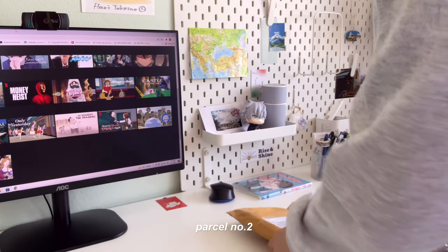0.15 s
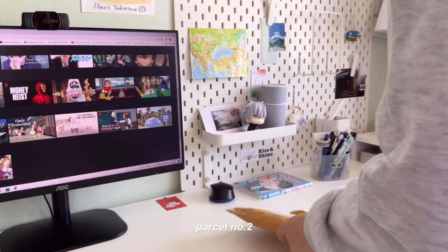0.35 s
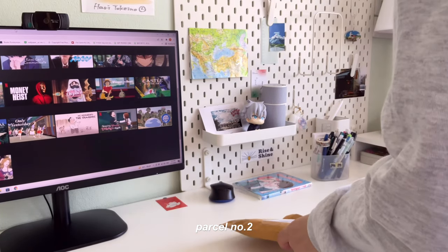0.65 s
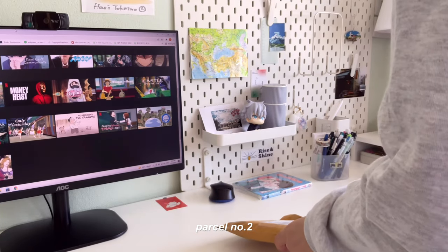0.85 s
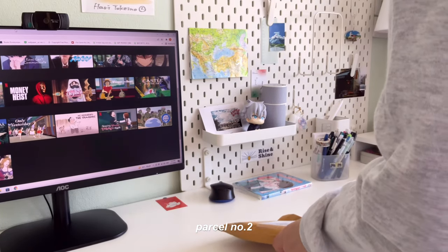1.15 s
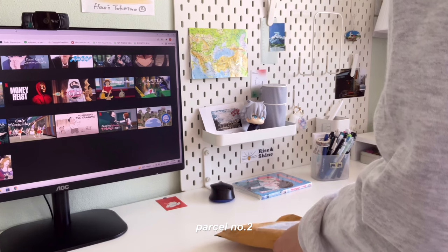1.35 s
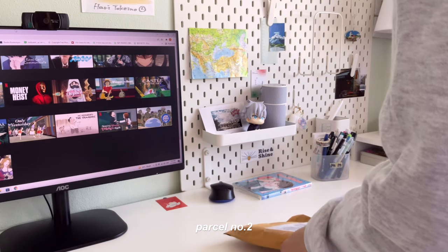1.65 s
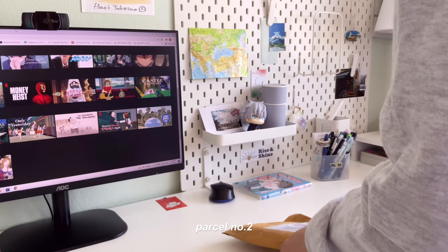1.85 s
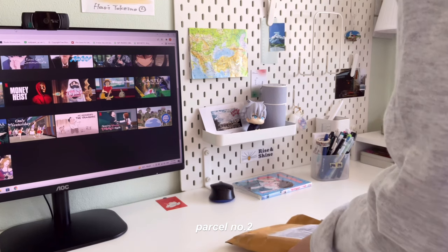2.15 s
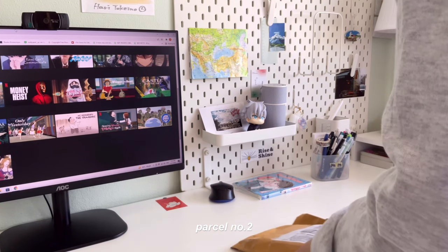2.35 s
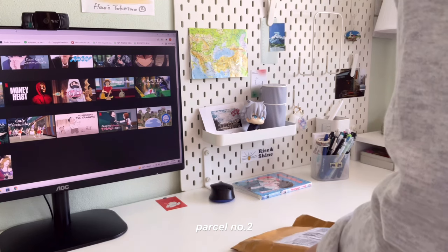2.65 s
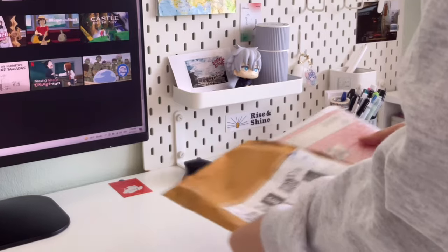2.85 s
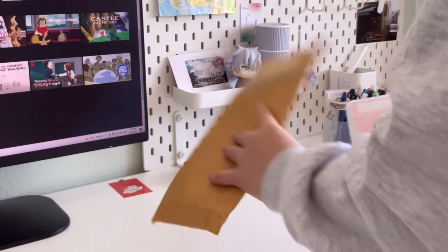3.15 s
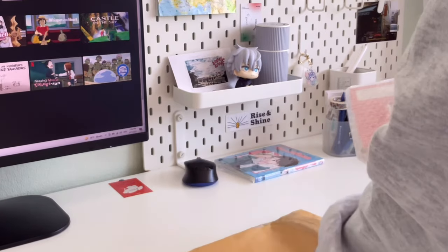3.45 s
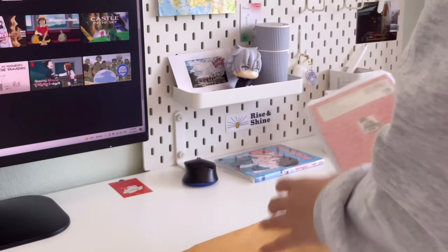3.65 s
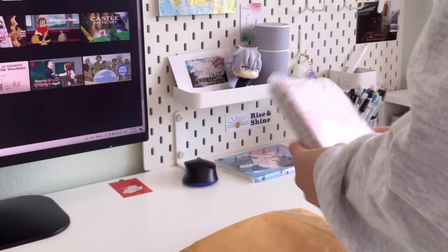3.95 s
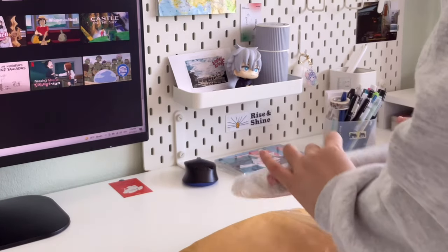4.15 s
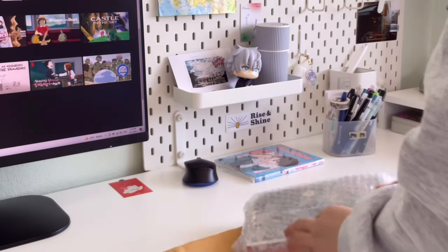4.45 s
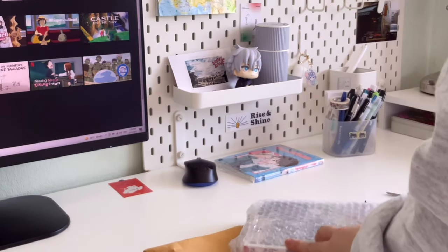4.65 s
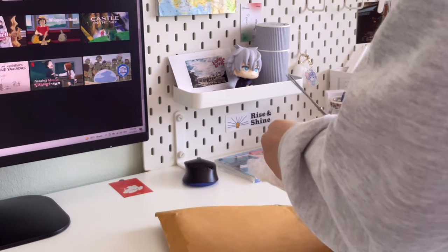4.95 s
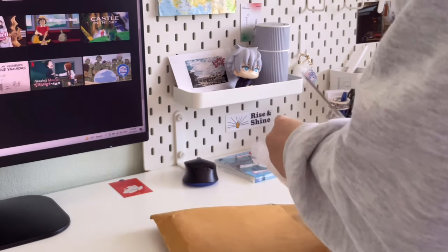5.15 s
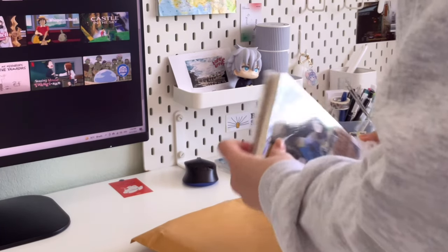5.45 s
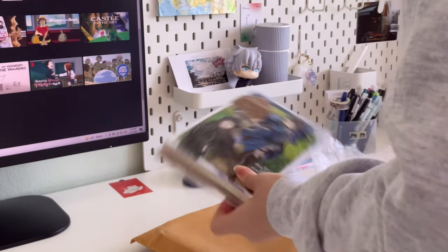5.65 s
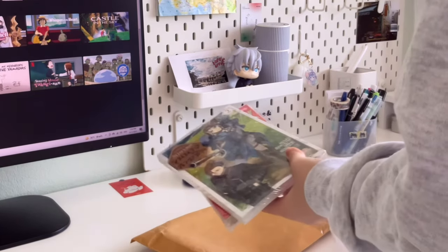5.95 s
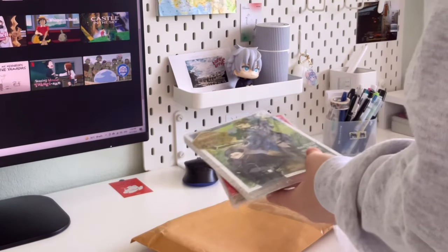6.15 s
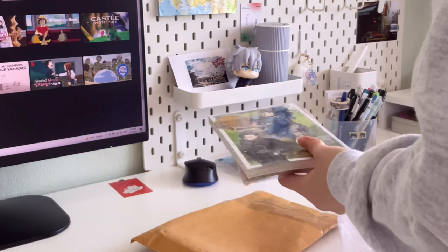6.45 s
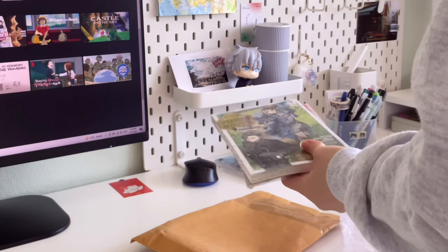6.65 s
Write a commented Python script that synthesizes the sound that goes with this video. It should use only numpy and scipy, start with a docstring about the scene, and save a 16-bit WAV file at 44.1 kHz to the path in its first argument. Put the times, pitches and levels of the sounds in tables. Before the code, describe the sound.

Close stereo phone pickup of a parcel being opened: an initial papery crackle, near quiet, uneven sawing and tearing strokes, then a dense loud flurry of stiff paper snaps and light desk thumps. Afterwards sparse wrap handling, one stronger crinkly hiss, faint ticking film and finally a short hollow case clack. Small, slightly live room with steady low hum and wavering rumble.

```python
"""At a desk in a small quiet room a padded paper mailer is sawn and torn open, emptied and dropped; then the
plastic wrap inside is turned over and slid off a hollow case, which knocks. Dense slips rub with a grainy hiss,
buckles ring patches of the sheet, bursts ring snapping creases and ticking wrap, and modes ring the case.
Filtered noise hums and rumbles low throughout. A phone's two ports listen from the side."""
import sys
import numpy as np
from scipy import signal
from scipy.fft import rfft, irfft, next_fast_len
from scipy.io import wavfile

SR = 44100
rng = np.random.default_rng(int(sys.argv[2]) if len(sys.argv) > 2 else 0)


def put_to_file(sound):
    """Save the sound as 16-bit audio at rate SR, in the file named by the first command-line argument."""
    columns = np.atleast_2d(sound).T  # one column per channel
    safe = np.clip(columns, -1, 1)
    whole_steps = np.round(safe * 32767)
    wavfile.write(sys.argv[1], SR, whole_steps.astype(np.int16))


N = 299880
SIZE = next_fast_len(N + SR)   # FFT length
BIN_HZ = np.arange(SIZE // 2 + 1) * SR / SIZE


def amp(db):
    """Decibels to amplitude."""
    return 10 ** (np.asarray(db) / 20)


def rms_one(x):
    """Scale to rms 1."""
    return x / np.sqrt(np.mean(x ** 2) + 1e-20)


def at_hz(points, hz):
    """Read a (Hz, value) table on a log frequency axis."""
    table = np.array(points)
    return np.interp(np.log(hz + 1), np.log(table[:, 0] + 1), table[:, 1])


def in_time(rows, quiet_db=None):
    """Columns joined by straight lines in time; quiet_db holds outside the rows."""
    seconds, *columns = np.transpose(rows)
    t = np.arange(N) / SR
    return [np.interp(t, seconds, column, quiet_db, quiet_db) for column in columns]


def filtered(x, response):
    """Multiply the spectrum by a response."""
    return irfft(rfft(x, SIZE) * response, SIZE)[..., :N]


def drift(rate_hz):
    """Slow random wander of rms 1: noise through a two-pole low-pass."""
    r = np.exp(-2 * np.pi * rate_hz / SR)
    wander = signal.lfilter([1], [1, -2 * r, r * r], rng.standard_normal(N + SR))
    return rms_one(wander[SR:])   # settled part only


def ring(x, hz, cycles):
    """A resonant mode that dies by 60 dB in so many cycles."""
    r = amp(-60 * hz / (cycles * SR))
    w = 2 * np.pi * min(hz, 17000.) / SR
    return signal.lfilter([0, np.sin(w)], [1, -2 * r * np.cos(w), r * r], x + 1e-18)


def grains(per_s, spread_db, clump_db, clump_hz):
    """Tiny slips of uneven size and random sign that come in clumps; rms 1."""
    sizes = amp(spread_db * np.minimum(rng.exponential(1, N), 5)) * rng.choice([-1, 1], N)
    happens = rng.random(N) < per_s / SR
    return rms_one(sizes * happens * amp(clump_db * drift(clump_hz)))


def burst(noise, length_s):
    """A sharp release followed by ragged after-slips that decay exponentially."""
    t = np.arange(len(noise)) / SR
    release = 3.06 * (t < 5e-5)
    return (noise + release) * np.exp(-t / np.clip(length_s, 2e-4, .02))


def add(out, s, sound, peak_db, pan_db, lag):
    """Lay in a sound of given peak; pan_db is left minus right, lag delays the left in samples."""
    for side, sign in zip(out, (1, -1)):
        at = round(s * SR) + (lag if sign > 0 else 0)
        part = side[at:at + len(sound)]
        part += amp(peak_db + sign * pan_db / 2) * sound[:len(part)] / np.max(np.abs(sound))


def blend(mid, side):
    """Two noises mixed to a set left-right likeness per frequency."""
    # Each row: frequency in Hz, left-right likeness (1 = alike, 0 = unrelated).
    likeness = [(60, 1.0), (130, 0.98), (290, 0.85), (640, -0.04), (1410, -0.071), (3100, 0.17),
                (6820, 0.96), (15000, 0.99)]
    alike = np.clip(at_hz(likeness, BIN_HZ), -1, 1)
    mid = filtered(mid, np.sqrt(1 + alike))
    side = filtered(side, np.sqrt(1 - alike))
    return np.array([mid + side, mid - side]) / np.sqrt(2)


def hands():
    """Each stroke swells to its peak and dies; powers add, and buckling power weights the panel's pitch."""
    # Strokes, tugs and squeezes. Each row: peak time, rise and fall in seconds, buckling level in dB,
    # panel pitch in Hz, rubbing level, sheen level and weight on the desk in dB; all levels before trim.
    strokes = [(0.096, 0.029, 0.05, -47, 1900, -39, -46.5, -55),
               (0.195, 0.015, .02, -40, 1590, -66, -69, -43.5),
               (0.219, 0.0026, 0.053, -45, 1820, -45, -52, -50),
               (.405, .01, 0.034, -57, 700, -66, -80, -43), (.58, 0.083, 0.24, -53, 515, -63, -74, -44),
               (.835, 0.045, 0.035, -55, 700, -82, -99, -46), (.95, 0.005, .03, -56, 800, -77, -97, -52),
               (1.01, .03, 0.026, -54, 780, -68, -95, -54),
               (1.042, 0.0038, 0.018, -45, 1000, -56, -57.5, -66),
               (1.22, 0.073, 0.055, -41, 779, -58, -55, -49),
               (1.291, 0.072, 0.07, -35.5, 1110, -43.5, -48, -39.5),
               (1.424, 0.0043, 0.062, -38.5, 884, -45.5, -57, -59),
               (1.536, 0.085, 0.067, -38, 794, -46.5, -51.5, -45.5),
               (1.722, 0.082, 0.17, -37, 1120, -45, -61, -52),
               (1.808, .005, 0.029, -43, 1020, -45, -50, -47),
               (1.951, 0.099, .12, -40.5, 1170, -47.5, -50.5, -64),
               (2.159, 0.055, 0.095, -30.5, 1070, -43.5, -44.5, -46),
               (2.35, 0.13, 0.1, -40.5, 1190, -46.5, -50, -59),
               (2.546, 0.016, 0.049, -26.5, 1120, -32, -31.5, -48),
               (2.618, 0.069, 0.056, -39.5, 1220, -38.5, -54, -56),
               (2.739, 0.065, 0.058, -38, 780, -53, -56, -41),
               (2.769, 0.0058, 0.057, -23.5, 900, -47, -56, -52),
               (2.839, 0.029, .03, -38, 1340, -34.5, -57, -34),
               (2.859, 0.052, 0.022, -23.5, 1090, -40, -51, -46),
               (2.905, 0.012, 0.042, -35, 1590, -56, -61, -30),
               (2.986, 0.044, 0.033, -31, 1190, -45, -48, -48),
               (3.044, 0.025, 0.035, -25.5, 1500, -37, -48, -35.5),
               (3.19, 0.054, .05, -60, 635, -63, -64, -60), (3.26, 0.0028, .03, -55, 1500, -51, -43.5, -60),
               (3.29, 0.023, 0.053, -24, 1340, -35.5, -43.5, -31),
               (3.338, 0.014, 0.078, -32, 1500, -39, -51, -37),
               (3.397, 0.0062, 0.078, -31.5, 500, -39, -54, -30.5),
               (3.611, 0.0065, 0.035, -29.5, 1530, -54, -76, -34.5),
               (3.66, 0.057, 0.13, -47, 1480, -56.5, -75, -61),
               (3.843, 0.0028, 0.057, -47.5, 1180, -45.5, -63, -44),
               (3.94, 0.17, 0.18, -64, 1200, -49.5, -50, -67),
               (4.08, 0.17, 0.17, -53.5, 960, -48, -48, -49.5),
               (4.254, 0.03, 0.2, -50.5, 700, -50.5, -52.5, -44.5),
               (4.34, 0.065, .08, -58, 1000, -50.5, -49, -58),
               (4.376, 0.01, 0.037, -27.5, 990, -46, -53, -32),
               (4.542, 0.063, 0.1, -33.5, 1300, -55, -63, -38),
               (4.664, .02, 0.075, -46, 1500, -57, -67, -38),
               (4.95, 0.026, 0.24, -67, 750, -52.5, -54.5, -49),
               (5.121, 0.073, 0.069, -56, 1700, -42.5, -41, -62),
               (5.144, 0.0032, 0.037, -37, 1100, -26, -46, -31.5),
               (5.181, 0.063, 0.094, -31.5, 712, -32.5, -33, -31.5),
               (5.24, 0.1, 0.16, -36.5, 1130, -37, -38, -36.5),
               (5.395, 0.14, .08, -59, 1100, -48.5, -50, -57),
               (5.816, 0.17, 0.11, -52, 970, -50.5, -50.5, -54),
               (6.599, 0.018, 0.11, -42, 1420, -40.5, -60, -42),
               (6.79, 0.0038, 0.06, -39, 1430, -32.5, -70, -71)]
    # Faint handling between strokes. Each row: time in seconds, buckling, rubbing and sheen in dB before trim.
    holding = [(0, -44.5, -51, -60), (.3, -49.5, -58.5, -68), (.53, -60, -74, -90), (.72, -75, -80, -104),
               (.86, -65.5, -111, -99), (1.0, -54, -74, -99), (1.1, -61, -70.5, -86),
               (1.4, -50.5, -58, -91), (2.07, -59, -70, -89), (2.48, -62, -68, -74), (2.9, -35, -44, -50.5),
               (3.1, -50.5, -54, -62), (3.25, -58.5, -70, -78), (3.48, -55, -56, -60.5),
               (3.8, -67, -70, -80), (4.22, -68, -62.5, -61), (4.47, -53, -54.5, -61.5),
               (4.72, -54, -57.5, -58), (4.9, -65, -69.5, -83), (5.05, -54.5, -54.5, -55),
               (5.5, -56.5, -58.5, -59), (5.95, -66, -60.5, -57.5), (6.1, -67, -68.5, -73.5),
               (6.4, -62, -69, -70), (6.56, -67, -69, -79), (6.8, -53, -62, -75)]
    holding_panel_hz, holding_weight_db = 700, -57.5
    span_db = 20.5   # level lost over one rise or fall
    step = 32   # samples per control point
    buckle_db, rub_db, sheen_db = [column[::step] for column in in_time(holding)]
    t = (np.arange(0, N + step, step) / SR)[:len(rub_db)]
    s, rise_s, fall_s, *peaks = np.array(strokes).T[:, :, None]
    stroke_buckle_db, stroke_panel_hz, stroke_rub_db, stroke_sheen_db, stroke_weight_db = peaks

    away = np.where(t < s, (s - t) / np.maximum(rise_s, .002), (t - s) / np.maximum(fall_s, .002))
    swell_power = amp(-2 * span_db * np.minimum(away, 6))
    stroke_levels_db = (stroke_buckle_db, stroke_rub_db, stroke_sheen_db, stroke_weight_db)
    parts = [amp(2 * db) * swell_power for db in stroke_levels_db]
    rests = [amp(2 * db) for db in (buckle_db, rub_db, sheen_db, holding_weight_db)]
    powers = [part.sum(axis=0) + rest for part, rest in zip(parts, rests)]

    pitch_sum = (parts[0] * stroke_panel_hz).sum(axis=0) + rests[0] * holding_panel_hz
    centre_hz = pitch_sum / powers[0]
    buckle_db, rub_db, sheen_db, weight_db = 10 * np.log10(powers)
    return in_time(np.transpose([t, buckle_db, centre_hz, rub_db, sheen_db, weight_db]))


def buckling(level_db, centre_hz):
    """Small buckles fall on patches of the sheet, each ringing a few cycles; the panel favours one pitch."""
    # Buckling colour. Each row: frequency in Hz, relative level in dB per Hz.
    paper = [(150, -32), (250, 1), (661, -3.5), (1010, -1), (1170, -20), (1300, 0), (1560, -3), (2690, -12),
             (3500, -16), (4550, -46), (7700, -120)]
    slips = grains(per_s=2500, spread_db=3.0, clump_db=1.0, clump_hz=60)
    pitches_hz = np.geomspace(260, 3200, num=16)
    patch = rng.integers(0, 16, N)   # which patch each slip falls on
    focus_db_per_octave = 3.8 * (centre_hz / 1000.) ** 1.7   # small taut panels keep closer to their pitch
    rings, power = 0, 0
    for k, hz in enumerate(pitches_hz):
        octaves_off = np.minimum(np.abs(np.log2(hz / centre_hz)), 1.5)
        gain = amp(at_hz(paper, hz) - focus_db_per_octave * octaves_off) * np.sqrt(hz)
        rings = rings + gain * rms_one(ring(slips * (patch == k), hz, cycles=9.5))
        power = power + gain ** 2
    return amp(level_db - 5.5) * rings / np.sqrt(power)


def rubbing(rub_db, sheen_db):
    """Fibres slip so densely that they hiss; smooth plastic adds the sheen on top."""
    # Rubbing colour. Each row: frequency in Hz, relative level in dB per Hz.
    rub_colour = [(1060, -13.5), (1800, -2.5), (1930, -3.5), (2620, -3), (3700, -2.5), (6860, -13.5),
                  (7560, -19.5), (8500, -22), (11000, -22.5), (18700, -120)]
    # Sheen colour. Each row: frequency in Hz, relative level in dB per Hz.
    sheen_colour = [(3530, -26.5), (6000, -0.5), (7800, -6), (11100, -3.5), (15200, -6), (16200, 5.5),
                    (16500, -47)]
    slips = grains(per_s=14000, spread_db=1.5, clump_db=1.5, clump_hz=85)
    rub = rms_one(filtered(slips, amp(at_hz(rub_colour, BIN_HZ))))
    sheen = rms_one(filtered(slips, amp(at_hz(sheen_colour, BIN_HZ))))
    return amp(rub_db - 2.5) * rub + amp(sheen_db - 2.0) * sheen


def desk(weight_db):
    """The desk top booms dully under the parcel: band-passed slips."""
    band = signal.butter(2, [110., 380.], "band", fs=SR, output="sos")
    slips = grains(per_s=600, spread_db=1.4, clump_db=3.7, clump_hz=49)
    return amp(weight_db - 5.5) * rms_one(signal.sosfilt(band, slips))


def snaps():
    """A crease gives way: a burst rings the panel and two neighbours."""
    # Creases snapping. Each row: start in seconds, peak in dB before trim, ring in Hz, burst decay in seconds.
    creases = [(0.069, -32.5, 1540, 0.0096), (0.08, -20.5, 2080, 0.01), (0.092, -21.5, 1810, 0.0058),
               (0.103, -24, 1880, .005), (.111, -28, 1980, 0.0047), (0.189, -31.5, 1030, 0.0032),
               (.217, -16, 1920, 0.0019), (.231, -34.5, 675, 0.0017), (1.042, -40, 807, 0.002),
               (1.244, -40, 940, 0.0027), (1.275, -26.5, 990, .0023), (1.299, -29.5, 855, 0.0069),
               (1.363, -30.5, 910, 0.0026), (1.538, -34, 1120, 0.0034), (1.699, -34, 1170, 0.0026),
               (1.726, -29, 1450, .0027), (1.754, -30, 870, 0.0075), (1.81, -25, 1010, 0.0037),
               (2.112, -35, 799, 0.0077), (2.15, -28.5, 980, 0.007), (2.17, -25.5, 960, 0.01),
               (2.532, -26, 1770, .0045), (2.548, -12, 1025, 0.0012), (2.577, -32, 1600, .003),
               (2.61, -30, 1490, .0038), (2.705, -36, 1550, .0034), (2.749, -26.5, 1320, .0036),
               (2.769, -26.5, 685, .0034), (2.781, -26, 900, 0.0027), (2.812, -22.5, 673, 0.0053),
               (2.84, -16, 1560, 0.007), (2.848, -21.5, 1160, .0047), (2.904, -19, 1920, 0.0066),
               (2.974, -32, 890, 0.0053), (2.983, -24, 1430, 0.0093), (3.036, -20.5, 1840, 0.0046),
               (3.046, -39, 1760, 0.0031), (3.114, -37.5, 1120, 0.0038), (3.276, -22, 1530, 0.0033),
               (3.294, -22.5, 1530, 0.0086), (3.34, -17.5, 1580, 0.0074), (3.397, -26, 394, 0.0039),
               (3.407, -22, 1530, 0.0047), (3.443, -22.5, 1230, 0.0055), (3.609, -18, 1970, 0.0062),
               (4.372, -22, 1160, 0.01), (4.499, -36, 950, 0.0052), (4.512, -27.5, 1250, 0.0052),
               (4.539, -23.5, 1330, 0.0058), (4.547, -17.5, 1300, 0.0019), (4.655, -26, 2050, .0039),
               (4.704, -34.5, 1000, 0.005), (4.941, -44, 880, 0.0042), (5.142, -27.5, 680, 0.004),
               (5.182, -20.5, 664, 0.0076), (5.23, -27, 1250, 0.0027), (5.79, -41, 1800, 0.0031)]
    pan_db, pan_scatter_db = -2.5, 1   # left minus right, and its spread
    out = np.zeros((2, N))
    noises = rng.standard_normal((len(creases), 2601))
    lags = rng.integers(-2, 3, len(creases))
    for (s, peak_db, hz, decay_s), noise, lag in zip(creases, noises, lags):
        push = burst(noise[1:], decay_s)
        panel = ring(push, hz, cycles=12.5)
        beside = ring(push, 0.58 * hz, cycles=4.2) + 1.34 * ring(push, 1.63 * hz, cycles=6.6)
        pan = pan_db + pan_scatter_db * noise[0]
        add(out, s, panel - 0.55 * beside, peak_db + 1.5, pan, lag)
    return out


def ticks():
    """Stiff fibres and film flip over in about a millisecond: broad, bright clicks."""
    # Fibres and wrap ticking. Each row: start in seconds, peak in dB before trim, centre in Hz,
    # top octave in dB from the peak before trim.
    clicks = [(.219, -24, 4040, -11), (1.141, -50, 6020, -3), (1.281, -31.5, 6010, -4),
              (1.2918, -29, 4790, -13), (1.4234, -42, 3580, -13), (1.706, -37, 4160, -9),
              (1.755, -38.5, 4180, 0), (1.8093, -49, 3780, -5), (2.1125, -39, 4200, -4),
              (2.516, -43, 5770, -12), (2.546, -11.5, 9000, -4), (2.615, -28, 4220, -27),
              (2.77, -32, 3680, -22), (2.8106, -24, 3800, -11), (2.844, -35, 3730, -27),
              (2.857, -20, 4240, -29), (2.9814, -23, 5740, -27), (3.034, -31, 4060, -20),
              (3.283, -31, 5800, -27), (3.2963, -21.5, 3520, -21), (3.335, -30, 4470, -13),
              (3.443, -42, 4170, -14), (3.61, -27.5, 3920, -35), (3.7365, -39, 3700, -10),
              (3.8636, -42, 4370, 1.5), (3.91, -35, 5660, -4), (4.0841, -32, 4450, -7),
              (4.916, -43, 4710, -8), (4.969, -39.5, 4550, -2), (5.046, -34, 5810, -15),
              (5.1423, -20, 3430, -17), (5.1834, -28, 6750, -10), (5.419, -40, 6230, 3),
              (5.677, -39, 4730, 5.5), (5.727, -40, 5690, -17), (5.7578, -43, 5780, -16),
              (5.7997, -31, 6020, -1), (5.818, -21, 8600, -2), (5.8281, -22, 7140, -9),
              (5.924, -31, 6050, -6), (5.9783, -35.5, 3600, -12), (6.004, -41.5, 5850, -5),
              (6.0194, -45, 4680, -19), (6.258, -53, 6060, -19), (6.4118, -22, 9600, -40),
              (6.444, -41, 6250, -20), (6.6564, -24.5, 9400, -35)]
    out = np.zeros((2, N))
    noises = rng.standard_normal((len(clicks), 900))
    lags = rng.integers(-1, 2, len(clicks))
    high = signal.butter(3, 3000., "high", fs=SR, output="sos")
    top = signal.butter(3, 8000., "high", fs=SR, output="sos")
    for (s, peak_db, hz, top_db), noise, lag in zip(clicks, noises, lags):
        push = signal.sosfilt(high, burst(noise, length_s=.0013))
        add(out, s, ring(push, hz, cycles=6.2) + 0.12 * push, peak_db + 3.5, 0, lag)
        add(out, s, signal.sosfilt(top, push), peak_db + top_db + 10.5, 0, lag)
    return out


def case():
    """Knocks and sliding fingers ring the same modes of the hollow plastic case."""
    # Knocks. Each row: start in seconds, peak in dB before trim.
    knocks = [(6.579, -14), (6.602, -22), (6.788, -24)]
    # Modes of the case. Each row: frequency in Hz, drive in dB, t60 in seconds.
    case_modes = [(163.5, -15, 0.2), (303, -12, 0.07), (780, -12, 0.05), (1460, -8, 0.036),
                  (1530, 2.5, 0.024), (2200, 7, 0.0092), (3510, 2.5, 0.032), (4500, -19, 0.0083),
                  (6250, -2, 0.025)]
    # The case slides in the hand. Each row: time in seconds, level in dB.
    slide = [(6.61, -46.5), (6.625, -39.5), (6.65, -48.5), (6.69, -59), (6.74, -56), (6.76, -45),
             (6.785, -53), (6.8, -48)]
    knock_soft_hz, finger_soft_hz = 3040, 1700   # low-pass cut-offs: a softer contact is duller

    def modes(push):
        """Sum of the case's ringing modes."""
        return sum(amp(drive_db) * ring(push, hz, hz * t60_s) for hz, drive_db, t60_s in case_modes)

    out = np.zeros((2, N))
    knock_filter = signal.butter(1, knock_soft_hz, fs=SR)
    for (s, peak_db), noise in zip(knocks, rng.standard_normal((len(knocks), 6000))):
        blow = signal.lfilter(*knock_filter, burst(noise, length_s=0.0031))
        add(out, s, modes(blow), peak_db + .3, 0, 0)
        clack = np.diff(burst(noise, length_s=0.0021))   # the contact itself
        add(out, s, clack, peak_db - 11.5, 0, 0)

    slips = grains(per_s=6000, spread_db=1.3, clump_db=.8, clump_hz=40)
    finger = signal.lfilter(*signal.butter(2, finger_soft_hz, fs=SR), slips)
    slide_db = in_time(slide, quiet_db=-120)[0]
    return out + amp(slide_db) * rms_one(modes(finger))


def ports(x):
    """Direct sound meets the phone's body: ports differ in phase and level, but not for long waves."""
    # Each row: frequency in Hz, left port's phase lead in radians before the long-wave taper.
    port_phase = [(0, 9.5), (520, -1.5), (950, 1.5), (1810, -0.06), (2760, -3), (3790, -5), (4480, -6),
                  (6200, -4.5), (7240, -3.5), (8180, -5), (9220, -19), (11600, -4.5), (15200, -9.5),
                  (16400, 9)]
    # Each row: frequency in Hz, left minus right in dB before the long-wave taper.
    port_balance = [(60, 3), (150, -3), (380, 8), (950, -2), (2380, 4), (5980, -7.5), (15000, 2)]
    short = BIN_HZ ** 2 / (BIN_HZ ** 2 + 300 ** 2)   # taper: 0 for long waves, 1 for short
    level = amp(short * at_hz(port_balance, BIN_HZ) / 2)
    turn = level * np.exp(.5j * short * at_hz(port_phase, BIN_HZ))
    return filtered(x, np.array([turn, 1 / turn]))


def room(x):
    """Reflections as octave bands of decaying noise, blended to the ports' likeness."""
    # Each row: frequency in Hz, t60 in seconds.
    room_t60 = [(200, 0.55), (1500, 0.46), (6000, 0.19), (16000, 0.25)]
    room_db = -13
    t = np.arange(SR // 2) / SR
    white = rng.standard_normal((2, len(t)))
    tail = 0
    for low_hz in 100 * 2. ** np.arange(8):
        band = signal.butter(2, [low_hz, min(2 * low_hz, 19000)], "band", fs=SR, output="sos")
        t60_s = at_hz(room_t60, np.sqrt(2) * low_hz)
        tail = tail + signal.sosfilt(band, white) * amp(-60 * t / t60_s)
    tail = tail * np.clip((t - .002) / 0.0027, 0, 1)   # first walls answer after a few ms
    tail = tail / np.sqrt(np.sum(tail ** 2) / 2)
    wet = filtered(x, rfft(tail, SIZE))
    return amp(room_db) * blend(wet[0], wet[1])


def hum():
    """Steady room tone: shaped noise, heavy in the bass, wavering a little."""
    # Each row: frequency in Hz, relative level in dB per Hz.
    hum_colour = [(35, -9.5), (60, -7.5), (81, -4), (133, -5.5), (189, -9.5), (427, -13), (540, -16.5),
                  (666, -19), (749, -21), (882, -21.5), (1620, -32.5), (4030, -67), (16000, -75.5)]
    hum_db, waver_db = -53, 1.6
    mid, side = filtered(rng.standard_normal((2, N)), amp(at_hz(hum_colour, BIN_HZ)))
    return amp(hum_db + waver_db * drift(rate_hz=1.4)) * rms_one(blend(mid, side))


def rumble():
    """Narrow low rumble near 50 Hz, like mains hum, rising and falling, alike at both ports: filtered noise."""
    # Each row: time in seconds, level in dB before trim.
    rumble_level = [(0.0, -46.5), (0.34, -44.5), (1.25, -56), (1.84, -45.5), (2.37, -74), (2.52, -52),
                    (3.01, -65), (3.2, -83), (3.39, -48.5), (3.79, -58), (3.94, -46.5), (4.35, -64),
                    (4.7, -49.5), (4.85, -49), (5.19, -50), (5.49, -50.5), (6.8, -59.5)]
    centre_hz, width_hz = 51.3, 6.7
    peak = 1 / (1 + ((BIN_HZ - centre_hz) / width_hz) ** 2)   # half amplitude at centre +- width
    noise = rms_one(filtered(rng.standard_normal(N), peak))
    return amp(in_time(rumble_level)[0] - 3.5) * noise


def scene():
    """Mix direct sound, the parcel's spread, reflections and background."""
    buckle_db, centre_hz, rub_db, sheen_db, weight_db = hands()
    near, far, edge = [buckling(buckle_db, centre_hz) + rubbing(rub_db, sheen_db) for _ in range(3)]
    dry = near + desk(weight_db) + case() + snaps() + ticks()
    spread = blend(far, edge)   # the parcel is wide: part of it sounds from other directions
    return ports(dry) + spread + room(dry.mean(axis=0)) + hum() + rumble()


def record(dry):
    """The microphone loses the deepest bass; the top is cut."""
    dry = signal.sosfilt(signal.butter(3, 38., "high", fs=SR, output="sos"), dry)
    return signal.sosfilt(signal.cheby2(16, 80, 16500, fs=SR, output="sos"), dry)


dry = scene()
out = record(dry)
put_to_file(out)
```